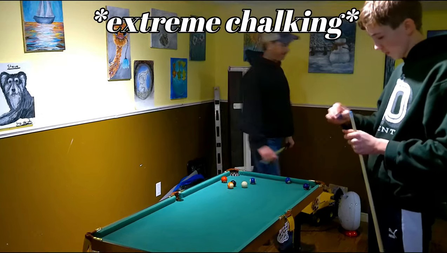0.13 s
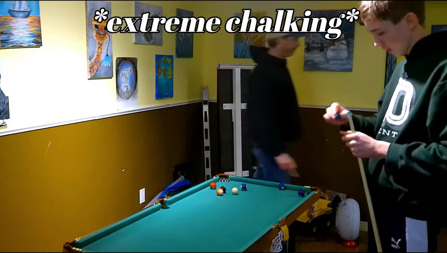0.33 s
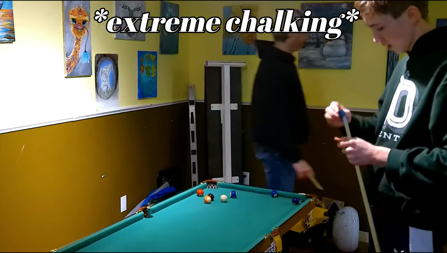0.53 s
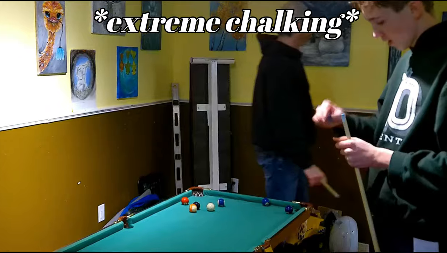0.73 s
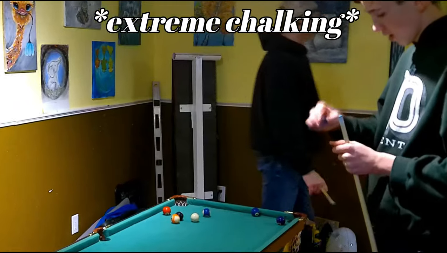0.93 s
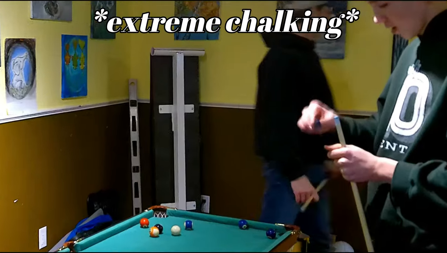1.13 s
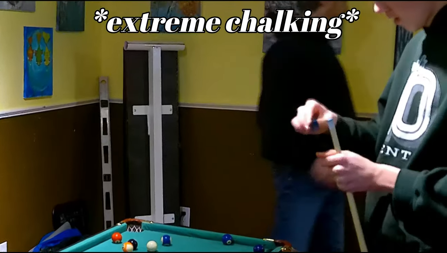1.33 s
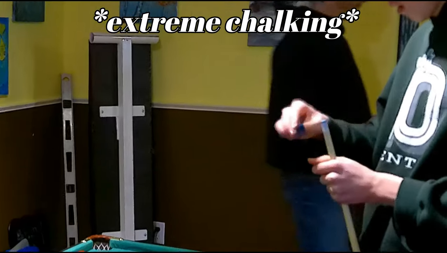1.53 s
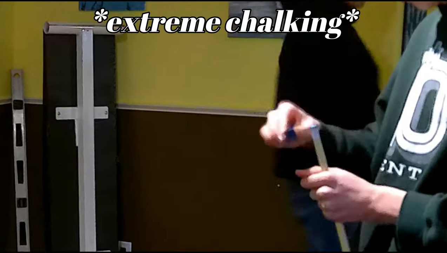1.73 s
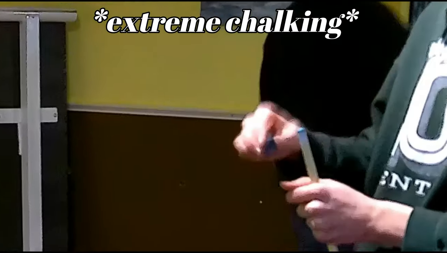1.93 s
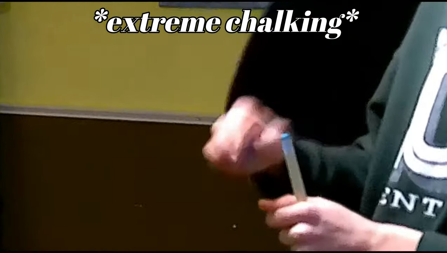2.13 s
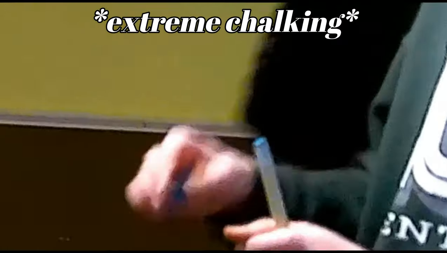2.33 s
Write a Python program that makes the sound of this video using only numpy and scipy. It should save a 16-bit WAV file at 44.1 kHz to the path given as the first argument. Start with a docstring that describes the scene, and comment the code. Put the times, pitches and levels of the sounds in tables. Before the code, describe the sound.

Chalk is twisted on a pool cue tip close by in a small, hard-walled room. Quick, gritty strokes knock and rasp, making the cue ring lightly and sometimes squeak, with two low thuds halfway through and faint hum underneath.

```python
"""A cube of chalk is twisted over a pool cue tip five times a second in a small, hard-walled room.
Each stroke knocks and chatters on the tip, which makes the cue ring. Then slipping grains scrape and
rub softly back, with a soft high hiss and sometimes a squeak. Two low thuds fall among the strokes.
Under it all lie room noise, hum and a faint, fast electrical pulsing."""
import sys
import numpy as np
from scipy import signal
from scipy.fft import rfft, irfft
from scipy.io import wavfile

SR = 44100
rng = np.random.default_rng(int(sys.argv[2]) if len(sys.argv) > 2 else 0)


def materialize(psi):
    """Save the field psi as 16-bit PCM at rate SR to the path in sys.argv[1].

    A 1-D psi becomes a single channel; in a 2-D psi each row is a channel.
    """
    bounded = np.clip(np.atleast_2d(psi).T, -1, 1)
    quanta = np.round(bounded * 32767).astype(np.int16)
    wavfile.write(sys.argv[1], SR, quanta)


N = 104605

# Chalk strokes. Each row: start in seconds, knock in dB, chatter fade in seconds, shaft ring in dB,
# scrape in dB, delay to the scrape's peak in seconds, its half-width in seconds, return rub in dB.
STROKES = [(-.012, -40.5, 0.024, -56, -39, 0.025, 0.015, -57),
           (.191, -47.5, 0.017, -44.5, -42.5, 0.046, 0.024, -57),
           (.401, -45.5, 0.026, -43, -42.5, 0.027, 0.015, -55.5),
           (.592, -38.5, 0.03, -49, -44.5, 0.065, 0.021, -48.5),
           (.797, -37, 0.019, -41, -44, 0.011, 0.016, -50.5),
           (.997, -34.5, 0.077, -38.5, -39, 0.0082, 0.013, -49),
           (1.192, -37, 0.036, -38.5, -43.5, 0.012, 0.017, -51),
           (1.39, -38.5, 0.018, -43, -47.5, .030, 0.047, -53),
           (1.599, -38, 0.029, -42.5, -41, 0.032, 0.021, -51.5),
           (1.800, -37.5, 0.052, -39.5, -40.5, .028, 0.02, -52),
           (2.002, -36, 0.03, -38, -36.5, 0.0078, 0.022, -59),
           (2.186, -37, 0.046, -34, -38, .028, .019, -60),
           (2.351, -42, 0.042, -38, -48, 0.0094, 0.037, -43.5)]
# Ringing notes of cue and chalk, then the shaft's lower ones.
# Each row: pitch in Hz, seconds to fade by 60 dB, relative level in dB.
CUE_NOTES = [(947.7, 0.12, 2.5), (1307, 0.78, -5.5), (1270, 0.08, 8.5), (1432, 0.065, -15),
             (1592, 0.12, -15.5), (1530, 0.15, -12.5), (1782, 0.59, -17.5), (1970, 0.3, -3),
             (2123, 0.34, -25.5), (2346, 0.075, -28), (2615, 0.41, -21), (2740, 0.54, -4), (3190, 0.11, 0),
             (3500, 0.26, -25), (4657, 0.093, -5), (4890, 0.12, -7)]
SHAFT_NOTES = [(513, 0.03, -22), (566.3, 0.041, 2), (596, 0.069, 4), (619.3, 0.28, 4), (781, 0.089, -1.5)]
# Extra light scuffs. Each row: time in seconds, half-width in seconds, level in dB.
SCUFFS = [(0.604, 0.012, -60), (1.095, 0.074, -49.5), (1.987, 0.014, -49)]
# Squeaks where the chalk grips. Each row: time in seconds, pitch in Hz, level in dB.
SQUEAKS = [(0.021, 5560, -47), (0.438, 3770, -47), (0.813, 3130, -39), (1.636, 3140, -43.5),
           (2.225, 3360, -55)]
# Dull thuds. Each row: start in seconds, level in dB, fade in seconds.
THUDS = [(1.03, -46, 0.054), (1.243, -35.5, 0.032)]
# The tone colour of each noise. Each row: frequency in Hz, relative level there in dB.
KNOCK_COLOUR = [(150, -31.5), (400, -10), (750, 1.5), (1050, 0), (1500, 9), (2200, 5.5), (3500, -7.5),
                (5000, -10), (6400, -19.5), (7800, -20.5), (14000, -35)]
SCRAPE_COLOUR = [(200, -31.5), (600, -2.5), (1200, -1.5), (2200, -3), (3200, 2), (4200, -2), (5400, -3),
                 (6400, -6), (7600, -13), (10500, -19), (14000, -32)]
RUB_COLOUR = [(200, 17), (700, -1.5), (2000, 7), (3200, 1), (6000, -9), (10000, -18), (14000, -34)]
HIGH_HISS_COLOUR = [(2000, -28), (6000, -3.5), (8000, 0), (11000, -5.5), (14000, -14.5)]
THUD_COLOUR = [(80, -8), (250, -1), (600, -1.5), (1200, -5), (2200, -12), (6000, -22), (14000, -57)]
ROOM_NOISE_COLOUR = [(20, 6), (40, 5.5), (62, -3.5), (100, -2.5), (130, -2), (170, -6), (300, -8.5),
                     (500, -8), (1000, -11.5), (2500, -24), (5000, -28), (9000, -34), (14000, -36)]
# Steady hum. Each row: pitch in Hz, level in dB.
HUM_TONES = [(80, -56.5), (178.5, -61.5)]

RUB_DELAY_S, RUB_HALF_WIDTH_S = 0.11, 0.059
KNOCK_RING_DB, SCRAPE_RING_DB = -8, -12.5  # the cue's ring, compared with what sets it off
SIDE_ABOVE_HZ, SIDE_DB = 5830, -5


def chalking():
    """Each stroke knocks, scrapes and rubs back. Returns the chalk's rasp and the cue's ringing."""
    t = np.arange(N) / SR
    rasp, ringing, push, back = np.zeros((4, N))
    tip, cue, shaft = colour(KNOCK_COLOUR), notes(CUE_NOTES), notes(SHAFT_NOTES)
    for at, knock_db, fade, shaft_db, scrape_db, delay, width, rub_db in STROKES:
        contacts = chatter(fade)
        add(rasp, at, burst(ring(contacts, tip), knock_db))
        add(ringing, at, burst(ring(contacts, cue), knock_db + KNOCK_RING_DB))
        add(ringing, at, burst(ring(contacts, shaft), shaft_db))
        push += undb(scrape_db) * (t > at) * swell(at + delay, width)
        back += undb(rub_db) * swell(at + RUB_DELAY_S, RUB_HALF_WIDTH_S)
    push += sum(undb(db) * swell(at, width) for at, width, db in SCUFFS)
    rasp += ring(push * grit(), colour(SCRAPE_COLOUR))
    rasp += ring(back * grit(), colour(RUB_COLOUR))
    ringing += undb(SCRAPE_RING_DB) * ring((push + back) * grit(), cue)
    return rasp, ringing


def chatter(fade, count=11, gap_s=0.0048, contact_s=0.0028, scatter_db=1, bite_db=8):
    """The chalk bites with one clean click, then skips in weakening contacts that each crush some grit."""
    t = np.arange(SR // 3) / SR
    gaps = gap_s * (.5 + rng.random(count))
    starts = np.cumsum(gaps) - gaps[0]
    sizes = np.exp(-starts / fade) * undb(scatter_db * rng.standard_normal(count))
    crush = sum(size * (t >= at) * np.exp(-np.abs(t - at) / contact_s) for at, size in zip(starts, sizes))
    bite = undb(bite_db) * (t == 0)
    return bite + crush * rng.standard_normal(len(t))


def grit(grains_per_s=8000, spread_db=2.5, clumps_per_s=254, clump_db=1.4):
    """Grains slip with tiny clicks, which come in clumps as the surface grips and lets go."""
    slips = (rng.random(N) < grains_per_s / SR) * rng.choice([-1, 1], N)
    sizes = undb(spread_db * np.minimum(rng.exponential(size=N), 4))  # a few are much stronger
    grip = np.interp(np.arange(N) * clumps_per_s / SR, np.arange(N), rng.standard_normal(N))
    grains = slips * sizes * undb(clump_db * grip)
    return grains / np.std(grains)


def squeaks(half_width_s=0.0082, ring_s=0.024):
    """The slipping grains briefly lock onto one note."""
    return sum(undb(db) * ring(swell(at, half_width_s) * grit(), notes([(hz, ring_s, 0)]))
               for at, hz, db in SQUEAKS)


def high_hiss(below_scrape_db=22.5, half_width_s=0.023):
    """A soft high hiss swells around the peak of every scrape."""
    level = sum(undb(db) * swell(at + delay, half_width_s) for at, _, _, _, db, delay, _, _ in STROKES)
    return undb(-below_scrape_db) * ring(level * rng.standard_normal(N), colour(HIGH_HISS_COLOUR))


def thuds():
    """Dull, scuffing thuds, like footsteps, start suddenly and fade fast."""
    t = np.arange(N) / SR
    force = sum(undb(db) * (t > at) * np.exp(-np.abs(t - at) / fade) for at, db, fade in THUDS)
    return ring(force * grit(), colour(THUD_COLOUR))


def room(x, echo_db=-3, gap_s=0.0036, split_hz=4000, low_ring_s=0.44, high_ring_s=0.4):
    """The sound plus its many echoes off the walls, whose treble dies sooner."""
    t = np.arange(SR // 2) / SR
    echoes = rng.standard_normal(len(t)) * (t > gap_s)
    low = signal.sosfilt(signal.butter(1, split_hz, fs=SR, output="sos"), echoes)
    tail = low * die_away(t, low_ring_s) + (echoes - low) * die_away(t, high_ring_s)
    return x + undb(echo_db) * ring(x, unit(tail))


def room_noise(level_db=-48):
    """The room's steady rumble and hiss."""
    return undb(level_db) * ring(rng.standard_normal(N), colour(ROOM_NOISE_COLOUR))


def hum():
    """Two faint, steady low tones."""
    t = np.arange(N) / SR
    return sum(undb(db) * np.sqrt(2) * np.sin(2 * np.pi * (hz * t + rng.random())) for hz, db in HUM_TONES)


def pulsing(first_s=0.03, every_s=0.046, half_width_s=0.00079, level_db=-38.5):
    """Soft electrical blips, about 22 a second."""
    t = np.arange(N) / SR
    time_from_blip = (t - first_s + every_s / 2) % every_s - every_s / 2
    blips = np.exp(-.5 * (time_from_blip / half_width_s) ** 2)
    return undb(level_db) * (blips - blips.mean())


def undb(db):
    """Turn decibels into a number to multiply by."""
    return 10 ** (np.asarray(db) / 20)


def unit(x):
    """Scale to an energy of 1."""
    return x / np.sqrt(np.sum(x ** 2))


def ring(x, response):
    """Play a sound through an object, given the object's response to one click."""
    return signal.fftconvolve(x, response)[:len(x)]


def colour(points, size=4096):
    """A click with the given tone colour and an energy of 1."""
    hz, db = np.array(points).T
    frequencies = np.maximum(np.fft.rfftfreq(size, 1 / SR), 1)
    gains = undb(np.interp(np.log(frequencies), np.log(hz), db))
    # Keep the colour, but pack the energy at the start of the click.
    folded = irfft(np.log(gains))
    folded[1:size // 2] *= 2
    folded[size // 2 + 1:] = 0
    return unit(irfft(np.exp(rfft(folded))))


def notes(table):
    """The fading notes of an object tapped once, with a total energy of 1."""
    t = np.arange(SR // 2) / SR
    return unit(sum(undb(db) * unit(np.sin(2 * np.pi * hz * t) * die_away(t, ring_s))
                    for hz, ring_s, db in table))


def die_away(t, ring_s):
    """Fade by 60 dB every ring_s seconds."""
    return np.exp(-np.log(1000) * t / ring_s)


def swell(peak_s, half_width_s):
    """A bell-shaped rise and fall around one moment."""
    return np.exp(-.5 * ((np.arange(N) / SR - peak_s) / half_width_s) ** 2)


def burst(x, db, hold_s=0.03):
    """Give a short sound the energy of this level held for hold_s seconds."""
    return undb(db) * unit(x) * np.sqrt(hold_s * SR)


def add(track, at, x):
    """Mix a short sound into a track at a time in seconds."""
    start = int(at * SR)
    x = x[max(-start, 0):max(N - start, 0)]
    track[max(start, 0):max(start, 0) + len(x)] += x


def scene():
    """Everything sits in the centre; left and right differ only in the high treble."""
    rasp, ringing = chalking()
    near = rasp + high_hiss() + squeaks() + thuds()
    centre = room(near) + ringing + room_noise() + pulsing() + hum()
    scattered = ring(room(near), unit(rng.standard_normal(192))) + room_noise()
    treble_only = signal.butter(8, SIDE_ABOVE_HZ, "high", fs=SR, output="sos")
    side = undb(SIDE_DB) * signal.sosfilt(treble_only, scattered)
    return np.array([centre + side, centre - side])


def record(dry, top_hz=14250, offset_db=-31):
    """Cut the highest treble and lift the whole wave slightly off zero."""
    treble_cut = signal.ellip(10, .2, 70, top_hz, fs=SR, output="sos")
    return signal.sosfilt(treble_cut, dry) + undb(offset_db)


dry = scene()
out = record(dry)
materialize(out)
```